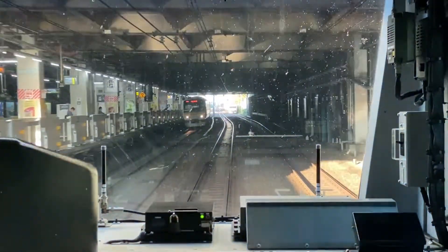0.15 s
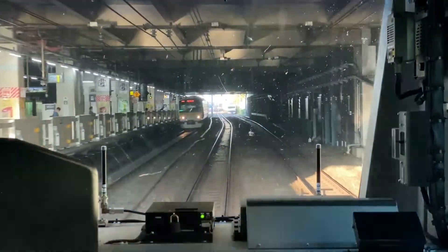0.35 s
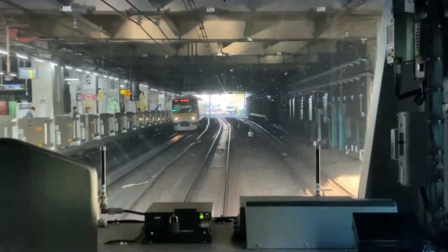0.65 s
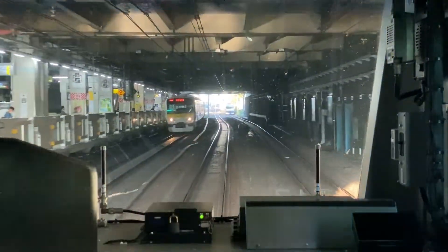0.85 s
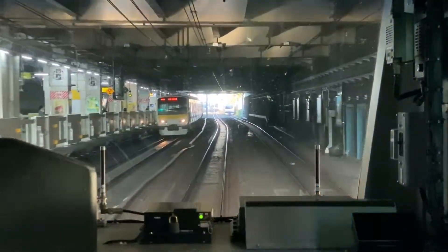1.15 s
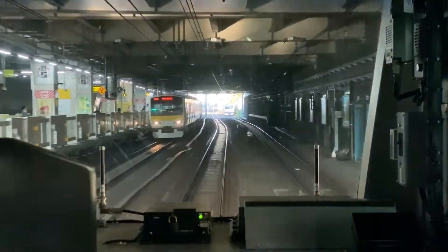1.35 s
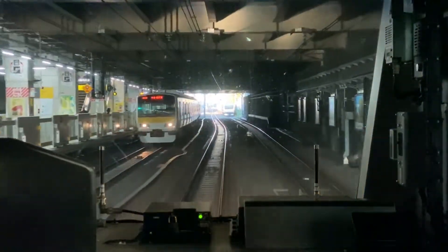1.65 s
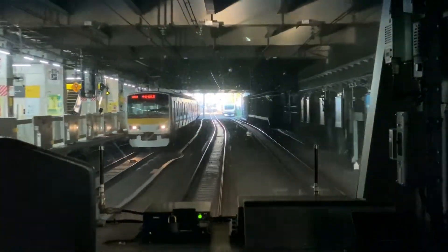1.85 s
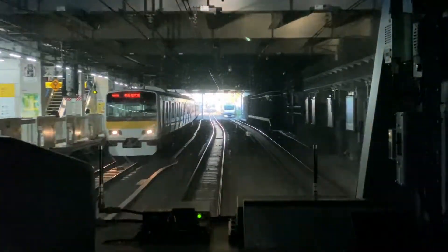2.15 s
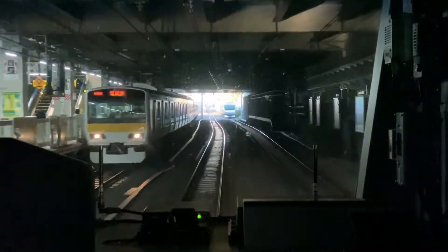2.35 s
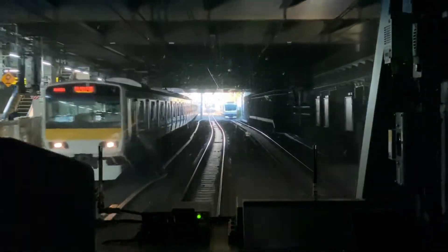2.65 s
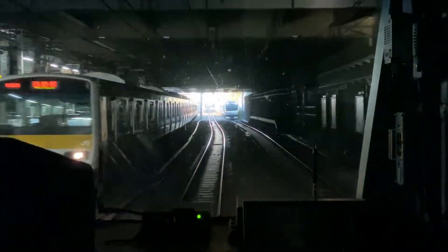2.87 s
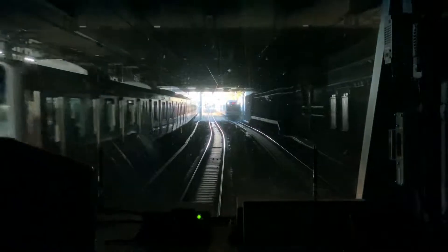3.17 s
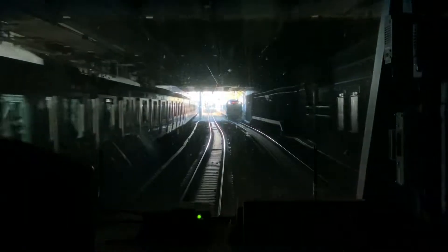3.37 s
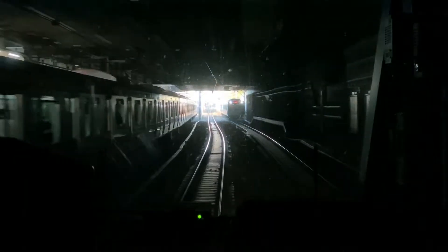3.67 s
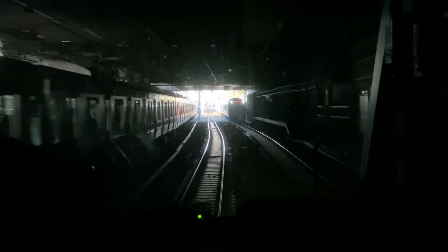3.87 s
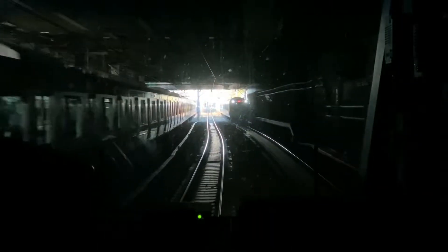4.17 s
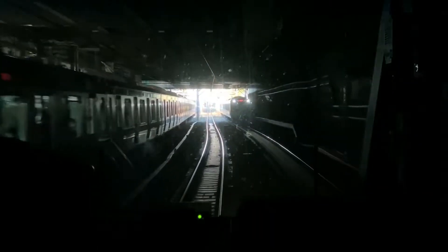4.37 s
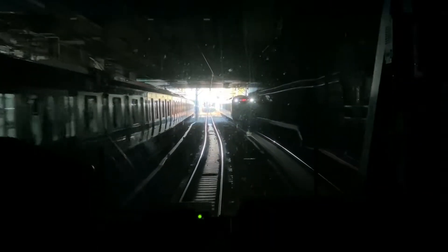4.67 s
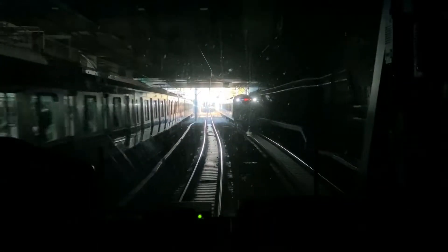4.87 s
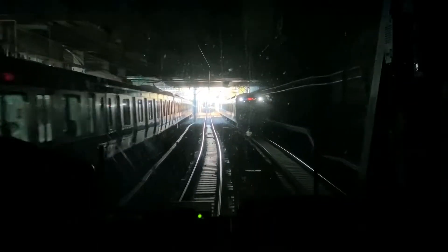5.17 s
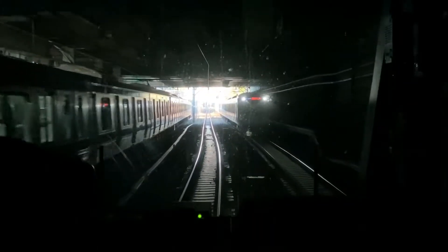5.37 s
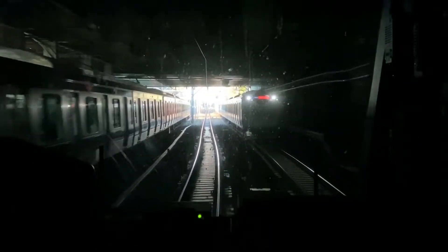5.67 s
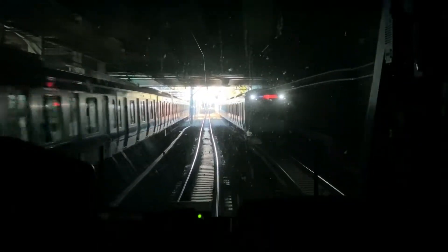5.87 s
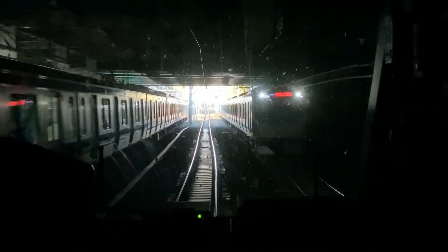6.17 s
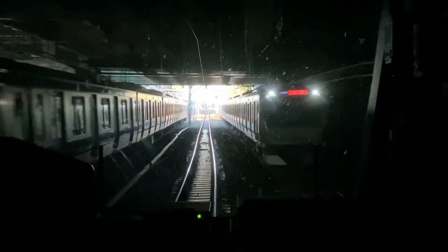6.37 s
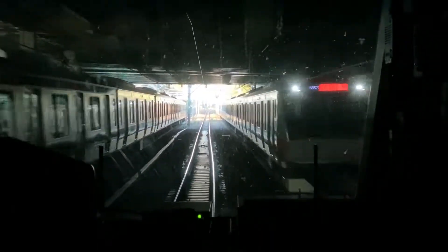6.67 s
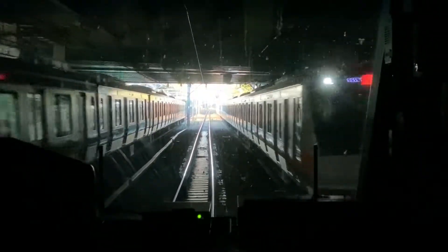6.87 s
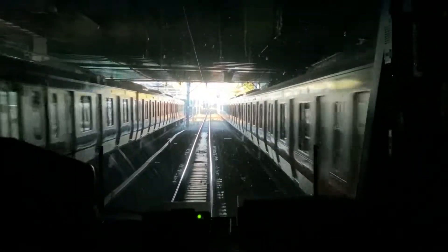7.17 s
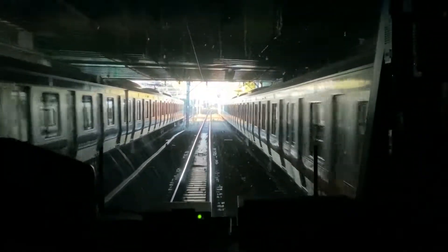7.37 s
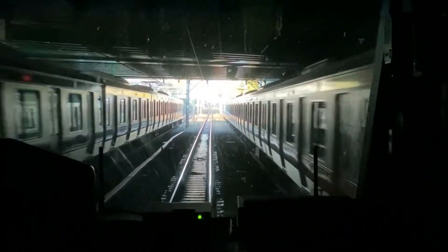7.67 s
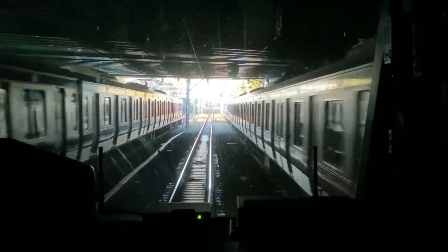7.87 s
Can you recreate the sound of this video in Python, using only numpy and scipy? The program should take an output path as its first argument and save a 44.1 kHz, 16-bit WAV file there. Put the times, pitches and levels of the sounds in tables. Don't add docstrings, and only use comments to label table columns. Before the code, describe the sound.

Low booming train rumble with wheel hums and soft hiss; ringing clatter at the start, a sharp knock midway, and a burst of door rattling near the end.

```python
import sys
import numpy as np
from scipy import signal
from scipy.fft import rfft, irfft, next_fast_len
from scipy.io import wavfile
from scipy.ndimage import uniform_filter1d

SR = 44100
rng = np.random.default_rng(int(sys.argv[2]) if len(sys.argv) > 2 else 0)


def wrap_up_sound(samples):
    columns = np.atleast_2d(samples).T
    tamed = np.clip(columns, -1, 1)
    steps = np.round(tamed * 32767).astype(np.int16)
    wavfile.write(sys.argv[1], SR, steps)


def volts(x):
    e = np.asarray(x, float) / 20
    return 10 ** e


N = 354122
KNOCK_S = 3.6442


def rms_one(x):
    return x / np.sqrt(np.mean(x ** 2) + 1e-20)


def in_time(rows):
    s, db = np.transpose(rows)
    curve = np.interp(np.arange(N) / SR, s, db)
    return curve - curve.mean()


def at_hz(points, hz):
    point_hz, value = np.transpose(points)
    return np.interp(np.log(hz), np.log(point_hz), value)


def colour(x, points):
    size = next_fast_len(N)
    hz = np.maximum(np.arange(size // 2 + 1) * SR / size, 1)
    inside = (hz > points[0][0]) & (hz < points[-1][0])
    return irfft(rfft(x, size) * volts(at_hz(points, hz)) * inside, size)[..., :N]


def drift(rate_hz):
    r = np.exp(-80 * np.pi * rate_hz / SR)
    slow = signal.lfilter([1], [1, -2 * r, r * r], rng.standard_normal(N // 40 + 2002))
    slow = slow[2000:]
    return np.interp(np.arange(N) / 40, np.arange(len(slow)), rms_one(slow))


def rough(patchy_db, rate_hz):
    return rng.standard_normal((2, N)) * volts(patchy_db * drift(rate_hz))


def evened(x, seconds):
    window = int(seconds * SR)
    swell = uniform_filter1d(uniform_filter1d(x ** 2, window), window)
    out = x / (swell / np.mean(swell) + 0.05) ** 0.4
    return out / np.std(out[0])


def hum(modes, patchy_db, even_s=0.049):
    out = 0
    for hz, width_hz, level_db, side_db in modes:
        r = np.exp(-np.pi * width_hz / SR)
        poles = [1, -2 * r * np.cos(2 * np.pi * hz / SR), r * r]
        once = signal.lfilter([1, 0, -1], poles, rough(patchy_db, 19))
        twice = signal.lfilter([1, 0, -1], poles, once)
        out = out + volts([[level_db], [level_db + side_db]]) * rms_one(twice)
    return evened(out, even_s)


def swells(rows, trim_db, widen=1.0):
    t = np.arange(0, N, 64) / SR
    power = np.zeros(len(t))
    for s, db, length in rows:
        power += volts(2 * (db + trim_db)) * np.exp(-(2 * (t - s) / (widen * length)) ** 2)
    return np.interp(np.arange(N) / SR, t, power)


def struck(modes, s, contact_s):
    out, start = np.zeros((2, N)), int(s * SR)
    for hz, level_db, t60 in modes:
        t = np.arange(min(int(2 * t60 * SR), N - start)) / SR
        turn = 2 * np.pi * hz * t
        level = volts(level_db - 60 * t / t60)
        build = np.sin(np.pi / 2 * np.minimum(t / contact_s, 1)) ** 2
        out[:, start:start + len(t)] += level * np.array([np.sin(turn), np.cos(turn)]) * build
    return out


def struck_often(modes, blows, contact_s):
    return sum(volts(level_db) * struck(modes, s, contact_s) for s, level_db in blows)


def rings(rows, trim_db, widen):
    out = np.zeros((2, N))
    for s, db, length, hz in rows:
        at = np.arange(max(int((s - 0.1) * SR), 0), min(int((s + 0.1) * SR), N))
        t = at / SR - s
        turn = 2 * np.pi * hz * t
        bell = volts(db + trim_db) * np.exp(-2 * (t / (widen * length)) ** 2)
        out[:, at] += bell * np.array([np.cos(turn), np.sin(turn)])
    return out


def running_gain(layer, swell=0):
    # t/s, level/dB
    track = [(0.0, -32.5), (0.11, -34), (0.29, -37), (0.6, -34.5), (0.83, -38.5), (1.47, -37.5),
             (1.81, -39.5), (2.3, -39), (2.46, -39.5), (3.53, -41), (4.07, -40), (6.78, -40), (7.4, -38.5),
             (7.54, -38), (7.72, -39.5), (8.03, -38)]
    # t/s, level/dB
    walls = [(0.0, -58.5), (0.8, -59.5), (1.36, -60.5), (1.83, -62), (3.87, -59), (4.0, -57.5), (4.76, -57),
             (5.75, -55), (5.95, -56), (6.95, -56), (7.65, -53), (8.03, -54)]
    # t/s, level/dB
    lean = [(0, 0), (.6, 6), (1.0, -11), (1.3, -5), (1.6, -1.5), (2.0, 1.5), (2.6, -1), (3.6, -8.5),
            (4.05, -3.5), (4.25, -2), (4.55, 0.5), (4.75, 7), (5.3, 5), (5.7, 5.5), (6.3, -0.5), (6.7, 4),
            (7.1, -1.5), (8.03, 2)]
    # mean level/dB, share of track, share of walls, share of lean
    answers = dict(rumble=(-33.5, 0.1, 1, -0.31), boom=(-32.5, 1.12, 0.72, -0.46),
               roar=(-39, 2.5, 0.42, -0.28), first=(-31.5, 0.37, -0.42, 0.16),
               second=(-44.5, 0.6, -0.2, 0.69), outer=(-47.5, -1.3, -0.7, 0.36),
               upper=(-51.5, 1.5, -0.5, -0.07), flange=(-53.5, 1.82, -0.7, -0.14),
               top=(-61.5, 0.7, 0.5, -0.05), roll=(-46, 1.2, 0.91, 0.11), air=(-56.5, 0.66, 0.95, 0))
    db, a, b, c = answers[layer]
    power = volts(2 * (db + a * in_time(track) + b * in_time(walls) + c * in_time(lean))) + swell
    duck_db, hold_s, back_s = -2, 0.19, 0.03
    age = np.arange(N) / SR - KNOCK_S
    duck = volts(duck_db * (age > 0) * np.clip(1 - (age - hold_s) / back_s, 0, 1))
    return np.sqrt(power) * duck


def floor_rumble():
    # f/Hz, level/(dB per Hz)
    spectrum = [(22, -19), (40, -14.5), (65, -2.5), (90, -11), (125, -11.5), (160, -17), (220, -23)]
    # t/s, level/dB, length/s
    heaves = [(0.272, -37.5, 0.064), (0.88, -28.5, 0.071), (1.007, -32, 0.065), (1.617, -33, 0.165),
              (1.757, -35, 0.6), (2.485, -30.5, 0.126), (2.692, -34, 0.054), (2.844, -26, 0.07),
              (3.868, -22, 0.087), (4.17, -25.5, 0.11), (5.268, -33.5, 0.049), (5.512, -28, 0.071),
              (6.327, -34, 0.041), (6.447, -36, 0.18), (7.431, -25.5, 0.15), (7.68, -25, 0.2)]
    gain = running_gain("rumble", swells(heaves, trim_db=-3.5))
    return gain * evened(colour(rough(3.3, 2.7), spectrum), 0.13)


def floor_boom():
    # f/Hz, level/(dB per Hz)
    spectrum = [(130, -26), (190, -7.5), (260, -2.5), (320, -3.5), (430, -5), (520, -33.5)]
    # t/s, level/dB, length/s
    flexes = [(0.213, -21, 0.23), (0.664, -29, 0.2), (1.381, -31.5, 0.051), (1.533, -23, 0.052),
              (1.841, -26, 0.05), (2.308, -40.5, 0.035), (2.766, -28, 0.067), (4.73, -30, 0.057),
              (4.937, -35.5, 0.065), (5.19, -35.5, 0.089), (5.44, -37.5, 0.022), (5.54, -34, 0.087),
              (5.676, -30, 0.049), (5.855, -28, 0.076), (6.125, -28.5, 0.13)]
    # t/s, level/dB, length/s
    bow_wave = [
        (7.002, -40, 0.31),
        (7.244, -32.5, 0.031),
        (7.353, -22.5, 0.088),
        (7.542, -19, 0.11),
        (7.98, -26.5, 0.051),
    ]
    gain = running_gain("boom", swells(list(flexes) + list(bow_wave), trim_db=-1.5))
    return gain * evened(colour(rough(0.26, 4.5), spectrum), 0.51)


def wall_roar():
    # f/Hz, level/(dB per Hz)
    spectrum = [(380, -18.5), (470, -2), (560, -2), (640, -6.5), (800, -3.5), (920, -15), (1200, -20.5),
                (1500, -25)]
    # t/s, level/dB, length/s
    gusts = [
        (.055, -34.5, 0.046),
        (.2, -26.5, 0.12),
        (1.5, -31.5, 0.21),
        (2.48, -40.5, 0.11),
        (7.2, -44.5, 0.036),
        (7.57, -33.5, 0.052),
        (7.65, -31.5, 0.059),
        (7.9, -34, 0.067),
    ]
    gain = running_gain("roar", swells(gusts, trim_db=-1.0))
    return gain * rms_one(colour(rough(1.0, 3.4), spectrum))


def wheel_hums():
    # f/Hz, width/Hz, level/dB, side level/dB
    first = [(371.8, 21, -3, -1.8), (389.6, 11.9, -1.5, -1.1)]
    second = [(740.8, 29, 0, -7)]
    outer = [(779, 48, 0, -1)]
    upper = [(1139, 69, -2.5, -2), (1542.5, 100, 1, 6.5)]
    flange = [(1886, 160, 0, 0.5)]
    top = [(2745, 55, 0.1, 0.1), (3740, 90, -20, 0.1)]
    # t/s, level/dB, length/s
    patches = [(0.903, -25, 0.017), (0.99, -22.5, 0.021), (1.013, -20, 0.017), (1.036, -25, 0.02),
               (1.078, -21.5, 0.044), (1.142, -21, 0.018), (1.206, -22, 0.021), (1.324, -25, 0.039),
               (1.414, -24.5, 0.015), (1.441, -25, 0.018), (1.523, -28, 0.025), (1.624, -26.5, 0.01),
               (1.655, -22.5, 0.035), (1.775, -25.5, 0.0086), (1.911, -25.5, 0.026), (2.125, -18.5, 0.014),
               (2.247, -21, 0.044), (2.36, -20.5, 0.022), (2.401, -21.0, 0.037), (2.467, -18, 0.02),
               (2.524, -20, 0.034), (2.716, -23, 0.022), (2.834, -22, 0.026), (2.89, -21, 0.0076),
               (3.05, -24, 0.018), (3.932, -18.5, 0.0081), (3.979, -23.5, 0.0094), (4.04, -23, 0.0088),
               (4.11, -20, 0.016), (4.241, -22, 0.03), (4.302, -22, 0.018), (4.774, -27, 0.011),
               (4.899, -20.5, 0.021), (4.942, -26, 0.0095), (5.314, -17.5, 0.012), (5.382, -18, 0.015),
               (5.415, -16, 0.015), (5.467, -19.0, 0.016), (5.515, -27, 0.023), (5.714, -22.5, 0.011),
               (5.867, -21, 0.031), (6.021, -23.5, 0.017), (6.177, -24, 0.018), (6.208, -25, 0.013),
               (6.231, -25.5, 0.019), (6.46, -18, 0.022), (6.499, -24.0, 0.04), (6.623, -24, 0.06),
               (6.739, -22, 0.037), (6.841, -22.0, 0.022), (7.0, -20, 0.021), (7.103, -22.5, 0.033),
               (7.25, -23, 0.018), (7.335, -24.5, 0.017), (7.366, -21, 0.018), (7.493, -23.5, 0.021),
               (7.585, -17, 0.027), (7.798, -23.5, 0.049), (7.874, -25.5, 0.018), (7.969, -22, 0.02)]
    # t/s, level/dB, length/s
    beads = [(0.968, -32.5, 0.015), (1.392, -35, 0.018), (1.42, -36.5, 0.018), (1.522, -35, 0.026),
             (1.546, -30, 0.021), (1.679, -30, 0.018), (1.738, -35.5, 0.028), (1.786, -30, 0.014),
             (1.904, -32.5, 0.035), (2.313, -28, 0.016), (2.421, -31.5, 0.022), (2.993, -31, 0.024),
             (4.19, -28, 0.037), (4.227, -34, 0.022), (4.291, -33.5, 0.051), (4.332, -29, 0.018),
             (4.653, -34, 0.018), (4.692, -28, 0.021), (4.727, -27.5, 0.02), (4.754, -33, 0.016),
             (4.812, -37, 0.026), (4.841, -30.5, 0.017), (4.9, -30.5, 0.023), (4.984, -32, 0.013),
             (5.015, -37.5, 0.035), (5.058, -29, 0.018), (5.162, -32.5, 0.038), (5.234, -29.0, 0.014),
             (5.258, -26, 0.018), (5.32, -28.5, 0.019), (5.359, -38.5, 0.017), (5.422, -29.5, 0.021),
             (5.525, -33.5, 0.02), (5.586, -35.5, 0.018), (6.933, -36.5, 0.026), (7.154, -34, 0.023),
             (7.535, -33, 0.012), (7.572, -34, 0.016), (7.966, -35.5, 0.016), (8.02, -29.5, 0.021)]
    # t/s, level/dB, length/s
    knots = [(0.08, -26, 0.064), (0.399, -22.5, 0.046), (.48, -28.5, 0.045), (0.58, -18.5, 0.07),
             (0.69, -27.5, 0.044), (.74, -22.5, 0.037), (.78, -25, 0.032), (.87, -34, 0.074),
             (1.36, -35, 0.068), (1.537, -38, 0.039), (6.02, -38.5, 0.091), (7.08, -40, 0.093),
             (7.25, -37, 0.054), (7.75, -46, 0.047)]
    # t/s, level/dB, length/s
    sings = [(.1, -40.5, 0.091), (1.15, -49, 0.33), (5.25, -45.5, 0.069), (5.6, -51, 0.74),
             (5.97, -46, 0.28), (7.1, -55, 0.48)]
    # t/s, level/dB, length/s
    rubs = [(1.15, -48, 0.24), (3.0, -48.5, 0.18), (3.9, -51, 0.31), (4.7, -47.5, 0.34),
            (5.05, -44.5, 0.42), (5.6, -46.5, 0.39), (6.0, -46.5, .3), (6.8, -55, 0.2)]
    # t/s, level/dB, length/s
    whines = [(.1, -44.5, .1), (.62, -53.5, 0.19), (1.5, -50, 0.12), (2.0, -58, 0.14), (2.14, -55.5, 0.066),
              (2.35, -56, 0.18), (2.55, -59, 0.074), (2.7, -58.5, 0.18), (3.85, -63, .15),
              (5.14, -59, 0.24), (5.75, -56.5, 0.27), (5.97, -50, 0.14), (7.5, -61, 0.26)]
    out = running_gain("first", swells(patches, -2.0, 1.14)) * hum(first, patchy_db=1.1, even_s=0.036)
    out += running_gain("second", swells(beads, -4.0, 1.5)) * hum(second, patchy_db=3.0, even_s=0.018)
    out += running_gain("outer", swells(knots, -3.5)) * hum(outer, patchy_db=3.0)
    out += running_gain("upper", swells(sings, -6.5)) * hum(upper, patchy_db=2.0)
    out += running_gain("flange", swells(rubs, -1.0)) * hum(flange, patchy_db=3.0)
    out += running_gain("top", swells(whines, -0.5)) * hum(top, patchy_db=1.5)
    return out


def rolling_hiss():
    # f/Hz, level/(dB per Hz)
    spectrum = [(800, -4.5), (950, -7), (1130, -5.5), (1320, -11.5), (1550, 0.5), (1750, -2.5), (1910, -3),
                (2150, -8), (2451, -12), (2901, -13.5), (3601, -36.5)]
    return running_gain("roll") * rms_one(colour(rough(1.0, 4.1), spectrum))


def leaking_air():
    # f/Hz, level/(dB per Hz)
    spectrum = [(2301, -0.5), (3001, 0.2), (3901, -9.5), (4901, -16), (5501, -20), (5801, -21),
                (6151, -18.2), (7001, -28.7), (8201, -36.5), (9501, -34), (11001, -40.5), (13001, -47.6),
                (15701, -49.5)]
    return running_gain("air") * rms_one(colour(rough(0.93, 9.9), spectrum))


def points_rings():
    # t/s, level/dB, length/s, f/Hz
    gaps = [(0.017, -12.5, 0.018, 420), (0.069, -13.5, 0.013, 383), (0.095, -26.5, 0.011, 412),
            (0.132, -20, 0.018, 390), (0.165, -12, 0.034, 372), (0.199, -10.5, 0.015, 386),
            (0.226, -19.5, 0.014, 376), (0.31, -18, 0.022, 417), (0.389, -15.5, 0.022, 387.5),
            (0.495, -20.5, 0.034, 405), (0.532, -20.5, 0.029, 388), (0.568, -8, 0.014, 396),
            (0.601, -16, 0.022, 383), (0.646, -18.5, 0.025, 394), (0.705, -19.5, 0.018, 382),
            (0.733, -20, 0.059, 402), (0.851, -19, 0.03, 378)]
    # t/s, level/dB, length/s, f/Hz
    sheets = [(0.031, -22.5, 0.018, 269.4), (0.067, -12.5, 0.011, 307), (0.093, -20, 0.022, 276),
              (0.151, -18.5, 0.019, 290), (0.182, -29, 0.02, 289), (0.206, -15, 0.026, 298),
              (0.238, -18, 0.02, 282), (0.265, -22.5, 0.011, 265), (0.305, -21, 0.02, 281),
              (0.393, -22.5, 0.023, 254.3), (0.597, -21.5, 0.015, 270), (0.67, -19.5, 0.025, 277.4)]
    return rings(gaps, trim_db=1.0, widen=1.18) + rings(sheets, trim_db=-2.0, widen=1.2)


def tread_nicks():
    # f/Hz, level/dB, t60/s
    tread = [(783, -2, 0.1), (838, -5, 0.11)]
    # t/s, level/dB
    nicks = [(.375, -22), (.41, -25.5), (.67, -21.5), (.715, -21), (.76, -22), (.845, -30)]
    return struck_often(tread, nicks, 0.021)


def rail_joint():
    # f/Hz, level/dB, t60/s
    wheel = [(450, 0.5, 0.17), (765, -3.5, 0.23), (1194, -8, 0.14), (1560, -12, 0.22), (2840, -35, 0.25)]
    # t/s, level/dB
    joints = [(0.552, -14)]
    return struck_often(wheel, joints, 0.019)


def loose_fittings():
    # t/s, thump level/dB, clatter level/dB, jingle level/dB, t60/s
    jolts = [(0.566, -29.5, -54, -68, 0.48), (7.388, -13.5, -31.5, -59.5, 0.17),
             (7.401, -14.5, -39, -65, 0.18), (7.417, -19.5, -49, -58.5, 0.12),
             (7.428, -14, -50.5, -64, 0.22), (7.45, -16.5, -51.5, -63.5, 0.25),
             (7.462, -27, -40, -62, 0.26), (7.525, -21, -44.5, -56, 0.38), (7.574, -25, -54, -76.5, 0.11)]
    # t/s, thump level/dB, clatter level/dB, jingle level/dB, t60/s
    rattles = [(1.391, -60, -42, -76, .05), (1.722, -60, -60, -66, .05), (1.752, -60, -47, -80, .2),
               (1.781, -60, -42, -80, .3), (3.052, -60, -47, -66, .2), (4.139, -60, -43, -69, .05),
               (4.687, -60, -43, -76, .05), (7.743, -40, -56, -61, .25)]
    # f/Hz, level/(dB per Hz)
    thump_spectrum = [(60, -11.5), (115, 3.5), (180, 6.5), (240, 1), (400, -5.5), (600, -16), (950, -21),
                      (1300, -19.5)]
    clatter_spectrum = [(800, -10), (1600, -3), (2400, 0), (3300, -6), (4200, -18), (5500, -32),
                        (7000, -45)]
    jingle_spectrum = [(3500, -10), (4500, -1), (6500, -3), (8000, -10), (10000, -16), (12000, -20),
                       (15700, -30)]
    rise_share = 0.017
    gains = np.zeros((3, N))
    for s, thump_db, clatter_db, jingle_db, t60 in list(jolts) + list(rattles):
        start = int(s * SR)
        age = np.arange(min(SR, N - start)) / SR
        shape = (1 - np.exp(-age / (rise_share * t60))) * volts(-60 * age / t60)
        gains[:, start:start + len(age)] += volts([[thump_db], [clatter_db], [jingle_db]]) * shape
    thump = colour(rough(10.0, 40), thump_spectrum)
    clatter = colour(rough(2.0, 150), clatter_spectrum)
    jingle = colour(rough(2.0, 150), jingle_spectrum)
    return gains[0] * rms_one(thump) + gains[1] * rms_one(clatter) + gains[2] * rms_one(jingle)


def flange_squeaks():
    # t/s, f/Hz, level/dB, t60/s
    squeaks = [(2.53, 4440, -63, .4), (2.6, 3770, -63, .4), (2.7, 3740, -62, .35), (2.8, 3775, -64, .3),
               (1.78, 2390, -51, .3), (3.04, 4430, -64, .3)]
    return sum(struck([(hz, level_db, t60)], s, 0.025) for s, hz, level_db, t60 in squeaks)


def slackening(modes, s):
    slacken_s, caught_db_per_s = 0.014, 3500
    out, start = np.zeros((2, N)), int(s * SR)
    t = np.arange(SR // 4) / SR
    for hz, level_db, t60, ratio, free_s in modes:
        pitch_hz = hz * (1 + (ratio - 1) * np.exp(-(t / slacken_s) ** 2))
        turn = 2 * np.pi * np.cumsum(pitch_hz) / SR
        fall_db = 60 * t / t60 + caught_db_per_s * np.maximum(t - free_s, 0)
        pair = volts(level_db - fall_db) * np.array([np.sin(turn), np.cos(turn)])
        out[:, start:start + len(t)] += pair * np.minimum(t / 0.0017, 1)
    return out


def panel_knock():
    # f/Hz, level/dB, t60/s
    tick = [(1160, -14, 0.055), (1550, -8, 0.021), (1676, -6, 0.02), (2430, -30, .01), (2910, -28, .012),
            (3180, -35, 0.01), (5480, -51, 0.012)]
    # settled f/Hz, level/dB, t60/s, pitch ratio at the blow, free time/s
    panel = [(300, 0, .3, 1.12, .0082), (540, -16, .25, 1.22, .032), (392, -14, .1, 1.01, .0082)]
    # settled f/Hz, level/dB, t60/s, pitch ratio at the blow, free time/s
    frame = [(197, -3, .075, 1.35, .08), (197, -14, .8, 1.35, .07), (343, -10.5, .6, 1.1, .052),
             (140, -12, .1, 1.2, .08)]
    thud_late_s, rebound_s = 0.0032, 3.658
    out = struck(tick, KNOCK_S, 0.002)
    out -= slackening(panel, KNOCK_S + thud_late_s)
    return out + slackening(frame, rebound_s)


def latch_jars():
    # f/Hz, level/dB, t60/s
    latch = [(664, -2, 0.078), (970, -4, 0.06), (1587, -6, 0.045), (2060, -12.5, 0.037)]
    # t/s, level/dB
    jars = [(7.387, -21.5), (7.398, -14.5), (7.411, -23), (7.418, -14), (7.433, -27), (7.461, -26),
            (7.53, -29.5), (7.586, -29.5), (7.636, -31)]
    return struck_often(latch, jars, 0.0018)


def pin_pings():
    # f/Hz, level/dB, t60/s
    pin = [(5600, -3, .015), (6300, -2, .015), (7500, 0, .02)]
    # t/s, level/dB
    pings = [(7.39, -59), (7.414, -57), (7.462, -58), (7.525, -62), (7.744, -59)]
    return struck_often(pin, pings, 0.0005)


def door_slaps():
    # f/Hz, level/dB, t60/s
    door = [(125, -6.5, 0.063), (250, 0, 0.071), (313, -6.5, 0.068), (388, -4.5, 0.034)]
    # t/s, level/dB
    slaps = [(7.3969, -17), (7.4037, -6), (7.4162, -9), (7.4301, -3.5), (7.4394, -6), (7.4514, -6),
             (7.456, -12), (7.486, -19.5), (7.64, -13.5), (7.727, -23.5)]
    return struck_often(door, slaps, 0.0017)


def body_lurches():
    # t/s, level/dB, length/s, f/Hz
    lurches = [
        (7.406, -16.5, 0.013, 106.2),
        (7.435, -14, .02, 105.8),
        (7.5, -19.5, .03, 119),
        (7.62, -24.5, 0.025, 79.5),
        (7.646, -19.5, 0.021, 85.4),
        (7.73, -16, .025, 70),
    ]
    return rings(lurches, trim_db=0.0, widen=0.81)


def microphone_ports(mid, side):
    # f/Hz, side minus mid level/dB
    width = [(60, -25), (87, -29.5), (120, -12.5), (180, -16.5), (260, -28.5), (370, -26.5), (540, -8.5),
             (780, -1), (1120, -1.5), (1500, -10.5), (2330, -23.5), (3360, -16)]
    # f/Hz, phase/rad
    phase_lead = [(100, .1), (1050, .4), (1250, -1.4), (2000, 0), (4000, .25), (5200, 1.0), (8200, 1.5),
                  (10300, .1)]
    treble_width = [(5001, -13.5), (9001, -8), (11001, -11.5), (11701, -23.5)]
    side = colour(side, [(15, -19.5)] + list(width) + treble_width)
    pair = np.array([mid + side, mid - side])
    size = next_fast_len(N)
    gap = at_hz(phase_lead, np.maximum(np.arange(size // 2 + 1) * SR / size, 1))
    turned = irfft(rfft(pair, size) * np.exp(0.5j * gap * [[-1], [1]]), size)[:, :N]
    return turned * volts([[-3.4], [-2.6]])


def scene():
    car = floor_rumble() + floor_boom() + wall_roar()
    car += wheel_hums() + rolling_hiss() + leaking_air()
    car += points_rings() + tread_nicks() + rail_joint()
    car += loose_fittings() + flange_squeaks() + panel_knock()
    car += latch_jars() + pin_pings() + door_slaps() + body_lurches()
    return microphone_ports(car[0], car[1])


def low_pass(x):
    return signal.sosfilt(signal.butter(12, 15720, fs=SR, output="sos"), x)


def record(dry):
    ceiling_db, release_db_per_s, ghost_hz = 0.3, 46, 12000
    notch_hz, notch_width_hz = 5765, 90
    t = np.arange(N) / SR
    over_db = np.maximum(20 * np.log10(np.abs(dry).max(axis=0) + 1e-9) - ceiling_db, 0)
    ramp = release_db_per_s * t
    held_db = np.maximum(np.maximum.accumulate(over_db + ramp) - ramp, 0)
    ducked = np.tanh(1.578 * dry * volts(-uniform_filter1d(held_db, size=60)))
    ghost = volts(-68.5) * ducked.mean(axis=0) * np.cos(2 * np.pi * ghost_hz * t)
    notch = signal.iirnotch(notch_hz, notch_hz / notch_width_hz, SR)
    heard = signal.lfilter(*notch, ducked + ghost)
    return low_pass(heard)


dry = scene()
out = record(dry)
wrap_up_sound(out)
```